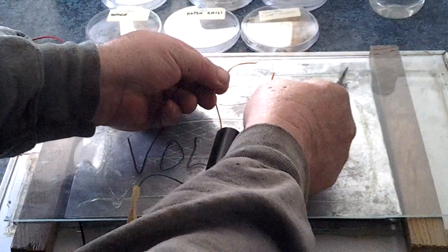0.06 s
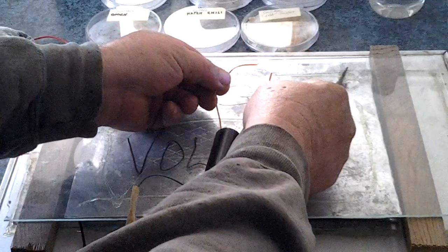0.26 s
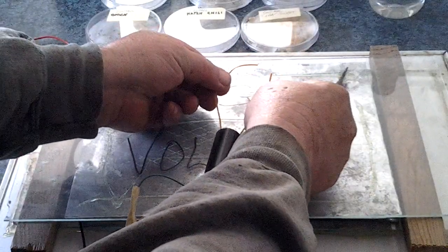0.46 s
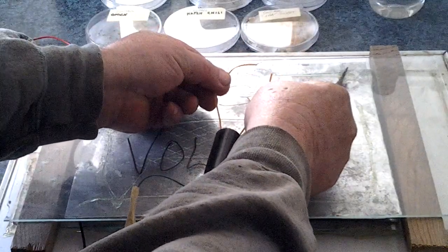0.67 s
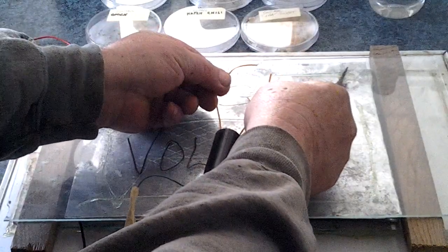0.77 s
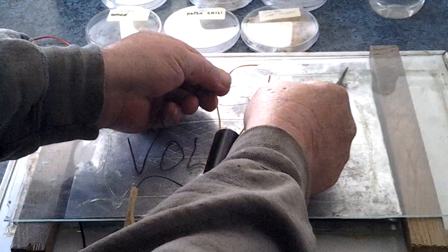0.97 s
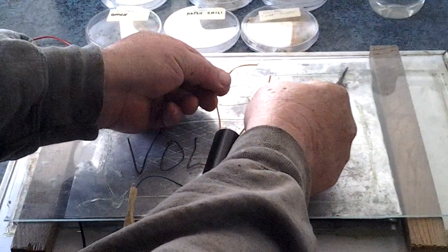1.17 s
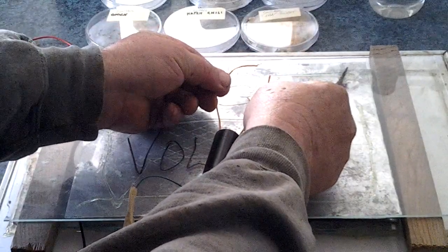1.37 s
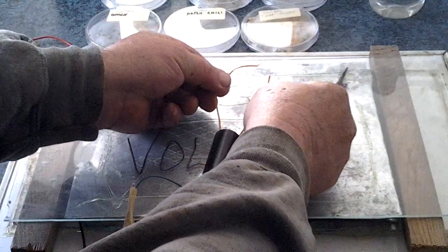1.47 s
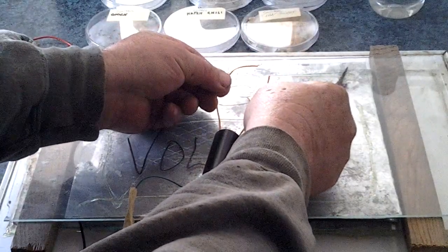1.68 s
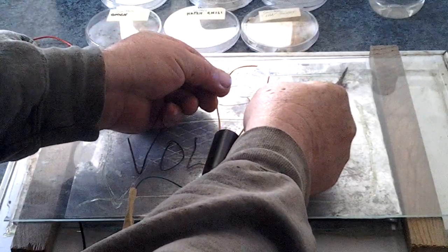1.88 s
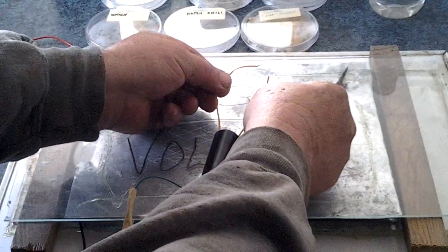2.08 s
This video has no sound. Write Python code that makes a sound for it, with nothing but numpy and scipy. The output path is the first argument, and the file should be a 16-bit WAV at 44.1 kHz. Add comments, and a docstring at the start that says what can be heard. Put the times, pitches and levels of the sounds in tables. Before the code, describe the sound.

Loud, bright electrical spark cracks at close range, quickening from scattered snaps to a fast burst

```python
"""Sparks across a wire gap

A high-voltage generator snaps sparks over glass: one alone, three close together, another alone, then seven.
Each crack is a sum of decaying sines with bright echoes; shaped noise makes the bench scatter and room tail. A
short low thud of fading low tones follows each crack, over quiet air noise and a faint hum. The close
microphone overloads on the cracks, and the bass drops out while the bright tail rings."""
import sys
import numpy as np
from scipy import signal
from scipy.fft import rfft, irfft, next_fast_len
from scipy.io import wavfile
from scipy.ndimage import uniform_filter1d

SR = 44100
rng = np.random.default_rng(int(sys.argv[2]) if len(sys.argv) > 2 else 0)


def wav_record(signal):
    """Record a signal, one row per channel, as 16-bit PCM in the file named by sys.argv[1]."""
    frames = np.transpose(np.atleast_2d(signal))
    bounded = np.clip(frames, -1, 1)
    # unit amplitude maps onto the largest positive 16-bit level
    quanta = np.round(bounded * 32767).astype(np.int16)
    wavfile.write(sys.argv[1], SR, quanta)


N = 93844  # length in samples


def amp(db):
    """Decibel law: the amplitude ratio of a level in dB."""
    return 10 ** (np.asarray(db) / 20)


def unit(x):
    """Power normalization: x scaled to rms 1."""
    return x / np.sqrt(np.mean(x ** 2) + 1e-20)


def along(points, hz):
    """Logarithmic frequency scale: interpolate (frequency_hz, value) points, held flat beyond the ends."""
    point_hz, values = np.transpose(points)
    return np.interp(np.log(hz + 1), np.log(point_hz + 1), values)


def filtered(x, response):
    """Convolution theorem: filtering multiplies the spectrum by a frequency response."""
    n = x.shape[-1]
    padded = next_fast_len(n + SR // 4)
    spectrum = rfft(x, padded) * response(np.fft.rfftfreq(padded, 1 / SR))
    return irfft(spectrum, padded)[..., :n]


def lowpass(x, hz, order):
    """Zero-phase filtering: a Butterworth magnitude with no phase shift."""
    return filtered(x, lambda f: 1 / np.sqrt(1 + (f / hz) ** (2 * order)))


def noise(spectrum, size):
    """Spectral shaping: white noise given a (frequency_hz, level_db) colour, at rms 1."""
    white = rng.standard_normal(size)
    return unit(filtered(white, lambda f: amp(along(spectrum, f))))


def add(track, start_s, x):
    """Superposition: sum x into the track from start_s."""
    i = round(start_s * SR)
    track[..., i:i + x.shape[-1]] += x[..., :N - i]


# spectrum of the air noise: frequency [Hz], relative density [dB per Hz]
AIR_SPECTRUM = [(20, -18), (45, -7), (90, 2.5), (180, -0.5), (290, 0), (400, -3), (850, -6.5), (1300, -9.5),
                (2800, -13), (4500, -16.5), (6000, -21), (9000, -16.5), (14500, -17)]
# steady hum tones: pitch_hz [Hz], rms level_db [dB]
HUM_TONES = [(285, -70), (872, -69.5)]
AIR_DB = -54.5  # rms


def room_tone():
    """Stationary background: coloured noise plus a few steady sinusoids of random phase."""
    t = np.arange(N) / SR
    hum = 0
    for pitch_hz, level_db in HUM_TONES:
        peak = amp(level_db) * np.sqrt(2)
        hum = hum + peak * np.sin(2 * np.pi * (pitch_hz * t + rng.random()))
    return hum + amp(AIR_DB) * noise(AIR_SPECTRUM, N)


# short ring of the direct pulse: pitch_hz [Hz], relative level_db [dB], t60_s [s]
PULSE_MODES = [(1298, -2, 0.0039), (5020, 8.5, 0.0024), (7058, -3, 0.025)]
# resonances of the bench and the things on it: pitch_hz [Hz], relative level_db [dB], t60_s [s]
BENCH_MODES = [(1001, -27.5, .08), (1435, -28.5, 0.051), (2766, -18, .05), (3953, -20, 0.086),
               (4255, -16, 0.056), (4897, -22, .055), (5120, -21, 0.097), (5400, -17, .06),
               (7650, -22, .05), (7940, -22.5, .07), (8236, -23.5, .055), (8900, -16.5, 0.043),
               (10900, -21, 0.054), (11320, -18.5, .065), (12560, -21, .065), (12470, -18, 0.042),
               (12660, -19.5, .065), (13270, -13.5, .05), (13940, -17.5, .05)]
# echoes off nearby surfaces: delay_s [s], relative level_db [dB], centre pitch_hz [Hz]
SURFACE_ECHOES = [(.0026, -2.5, 12500), (.003, -7.5, 2670), (.0035, 0, 9300), (.0056, 4.5, 12000),
                  (.0084, -2, 12200), (0.0197, -9.5, 11000), (0.029, -12, 12140)]
ECHO_RISE_S = 0.00016  # onset to envelope peak


def crack(t):
    """Modal decay and specular reflection: damped sines, then distinct delayed bursts."""
    out = np.zeros(len(t))
    for pitch_hz, level_db, t60_s in PULSE_MODES:
        out += amp(level_db - 60 * t / t60_s) * np.sin(2 * np.pi * pitch_hz * t)
    for pitch_hz, level_db, t60_s in BENCH_MODES:
        phase = 2 * np.pi * (pitch_hz * t + rng.random())
        out += amp(level_db - 60 * t / t60_s) * np.sin(phase)
    for delay_s, level_db, pitch_hz in SURFACE_ECHOES:
        age = np.maximum(t - delay_s, 0)
        u = age / ECHO_RISE_S
        envelope = u * np.exp(1 - u)  # peaks at 1 when u = 1
        out += amp(level_db) * envelope * np.sin(2 * np.pi * pitch_hz * age)
    return out


# spectrum of the bench scatter: frequency [Hz], relative density [dB per Hz]
SCATTER_SPECTRUM = [(300, -19.5), (700, -10.5), (950, -7.5), (1450, -4), (1900, -4), (2750, -8.5),
                    (3450, -7), (4130, -2), (5200, -3.5), (5900, -12), (6800, 1), (8000, -6), (9000, -1),
                    (9900, -2), (12000, -6.5), (13600, 1), (14500, -5.5)]
SCATTER_DB, SCATTER_T60_S = -7, 0.091  # relative level at onset; decay time


def scatter(t):
    """Diffuse early reflection: dense bench reflections as exponentially decaying noise."""
    return noise(SCATTER_SPECTRUM, len(t)) * amp(SCATTER_DB - 60 * t / SCATTER_T60_S)


# spectrum of the room tail before decay: frequency [Hz], relative density [dB per Hz]
TAIL_SPECTRUM = [(100, -33), (250, -7.5), (500, -12.5), (950, -7.5), (1200, -10.5), (1700, -2.5),
                 (2200, -7.5), (2800, -2.5), (3300, -5.5), (4050, 1), (5050, 0), (6300, -2), (8800, 0.5),
                 (13200, 1), (14500, -6)]
# decay of the room tail before its late fade: frequency [Hz], t60_s [s]
TAIL_DECAY = [(250, 0.39), (800, 0.42), (1500, 0.43), (2800, 0.46), (4300, 0.45), (7000, 0.36),
              (10000, 0.3), (14000, .28)]
TAIL_DB = -12  # noise level before decay and envelope
TAIL_RISE_S, TAIL_END_S = 0.016, 0.28  # time constants of the build-up and the late fade


def room_tail(t):
    """Frequency-dependent reverberation: the high treble dies first, and the end falls away faster."""
    hz, frame_s, cells = signal.stft(noise(TAIL_SPECTRUM, len(t)), SR, nperseg=256)
    decay = amp(-60 * frame_s / along(TAIL_DECAY, hz)[:, None])
    tail = signal.istft(cells * decay, SR)[1][:len(t)]
    envelope = (1 - np.exp(-t / TAIL_RISE_S)) * np.exp(-(t / TAIL_END_S) ** 4)
    return amp(TAIL_DB) * tail * envelope


def reflections(t):
    """Superposed reflections: the early bench scatter plus the room's tail."""
    return scatter(t) + room_tail(t)


# low tones of the thud: pitch_hz [Hz], relative level_db [dB]
THUD_TONES = [(215, -5), (325, -4.5), (455, 4), (555, -3), (745, -4.5)]
THUD_DB = -30  # shared by all tones, before each spark's own levels


def thud_tones(age):
    """Additive synthesis: the low tones of the thud, not yet fading, from age zero."""
    return sum(amp(THUD_DB + level_db) * np.sin(2 * np.pi * pitch_hz * age)
               for pitch_hz, level_db in THUD_TONES)


# sparks: start_s [s], relative level_db [dB], relative thud_db [dB], Gaussian thud_s to 1/e [s]
SPARK_EVENTS = [(0.3364, -0.1, -10, .006), (0.8647, 0.5, -19, 0.02), (0.9741, 0.5, 3, 0.0079),
                (1.0744, 1.4, 2.5, 0.018), (1.3128, 1, 0, 0.0067), (1.6179, 0.5, 1, 0.0062),
                (1.7195, 0.5, 3.5, 0.0048), (1.8002, -0.5, -1, 0.026), (1.892, -0.5, 2, 0.0069),
                (1.9583, -3.5, -7, 0.0065), (2.0373, -1, 3.5, 0.0071), (2.113, 0, 7.5, 0.0058)]
DRIFT = 0.43  # power share of scatter and tail drawn anew for each spark
THUD_DELAY_S = 0.0031


def sparks():
    """Partly coherent repetition: one crack recurs, with reflections part shared and part new."""
    t = np.arange(SR // 2) / SR
    out, direct, shared = np.zeros(N), crack(t), reflections(t)
    age = np.maximum(t - THUD_DELAY_S, 0)
    tones = thud_tones(age)
    for start_s, level_db, thud_db, thud_s in SPARK_EVENTS:
        thud = amp(thud_db) * tones * np.exp(-(age / thud_s) ** 2)
        paths = np.sqrt(1 - DRIFT) * shared + np.sqrt(DRIFT) * reflections(t)
        add(out, start_s, amp(level_db) * (direct + paths + thud))
    return out


def scene():
    """Linear superposition: sparks over the room tone, the same in both channels."""
    return np.tile(sparks() + room_tone(), (2, 1))


# bands where the bass drops out: upper edge_hz [Hz], signal level mute_above_db that mutes the band [dB]
SUPPRESSOR_BANDS = [(180, -38.5), (330, -32.5), (560, -28.5), (750, -24.5)]
MUTE_DB, OPEN_ABOVE_DB = -40.5, -15  # deepest gain before smoothing; level above which bass passes again


def suppress_bass(x, window_s=0.0063, knee_db=1):
    """Level-dependent gain: a low cut climbs with signal level, but is off in the quiet and on the cracks."""
    power = np.abs(uniform_filter1d(x[0] ** 2, max(1, round(window_s * SR))))
    level_db = 10 * np.log10(power + 1e-12)

    def above(db):
        """Soft threshold: 0 below the level db, 1 above it."""
        return .5 + .5 * np.tanh((level_db - db) / (2 * knee_db))

    out, below = x, 0
    for edge_hz, mute_above_db in SUPPRESSOR_BANDS:
        bass = lowpass(x, edge_hz, order=14)
        band = bass - below
        muting = above(mute_above_db) * (1 - above(OPEN_ABOVE_DB))
        gain = lowpass(amp(MUTE_DB * muting), 62, order=2)  # smooth the switching
        out = out + (gain - 1) * band
        below = bass
    return out


# bass shelf of the recorder: frequency [Hz], gain [dB]
BASS_SHELF = [(150, -3.5), (230, 0.5)]
CLIP_TOP, CLIP_HARDNESS = 0.9, 9  # limiting amplitude; exponent of the knee
TOP_HZ = 14680  # upper band limit


def record(dry):
    """Saturation and band limiting: the input clips, bass is thinned and muted, the top is cut off."""
    overload = 1 + np.abs(dry / CLIP_TOP) ** CLIP_HARDNESS
    clipped = dry / overload ** (1 / CLIP_HARDNESS)
    coloured = filtered(clipped, lambda hz: amp(along(BASS_SHELF, hz)))
    return lowpass(suppress_bass(coloured), TOP_HZ, order=110)


dry = scene()
out = record(dry)
wav_record(out)
```